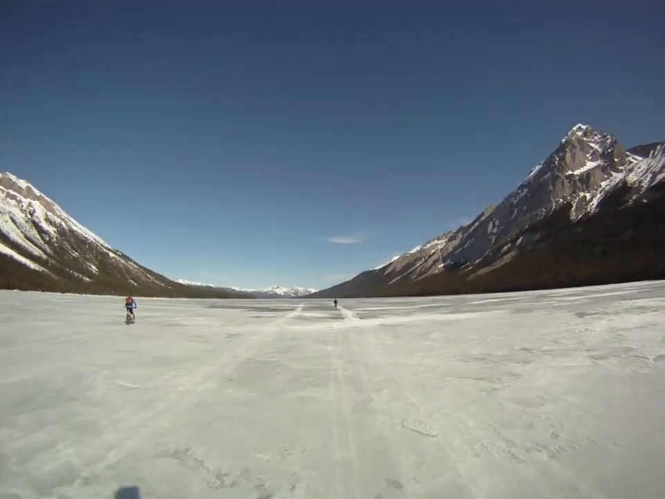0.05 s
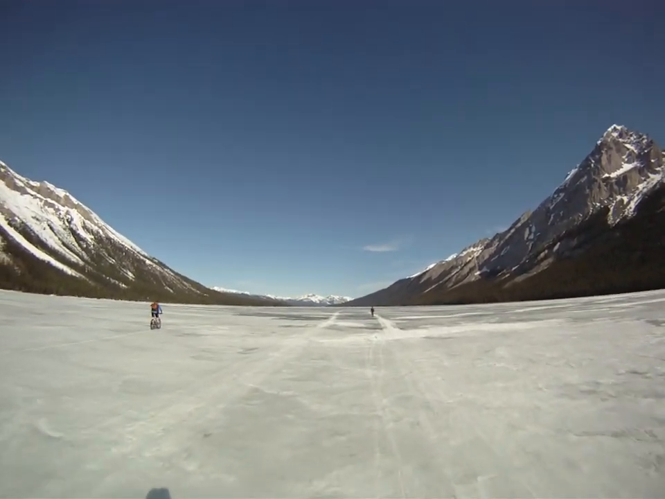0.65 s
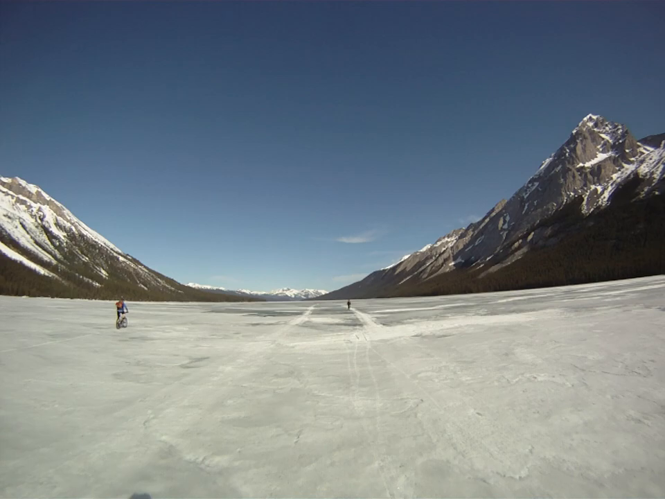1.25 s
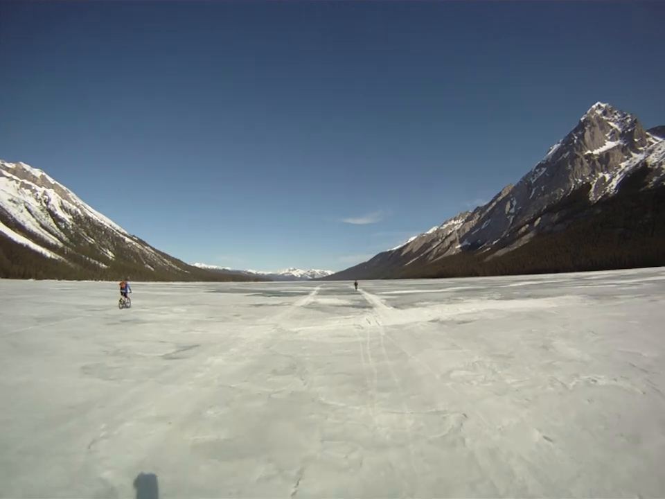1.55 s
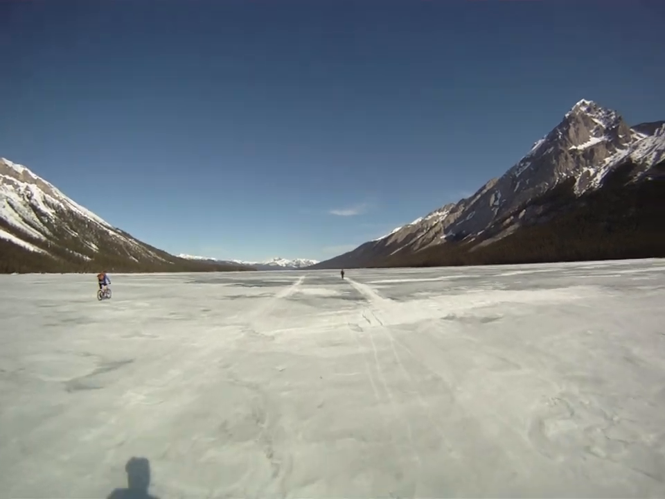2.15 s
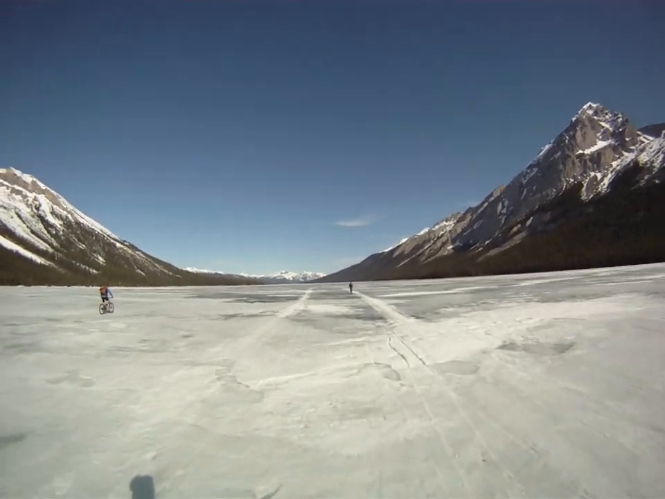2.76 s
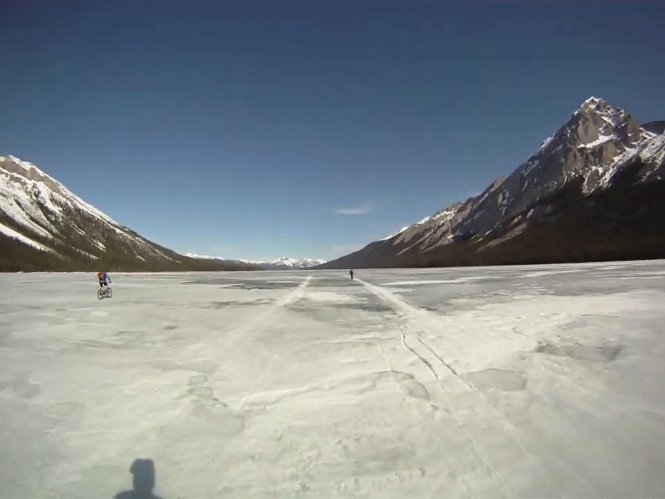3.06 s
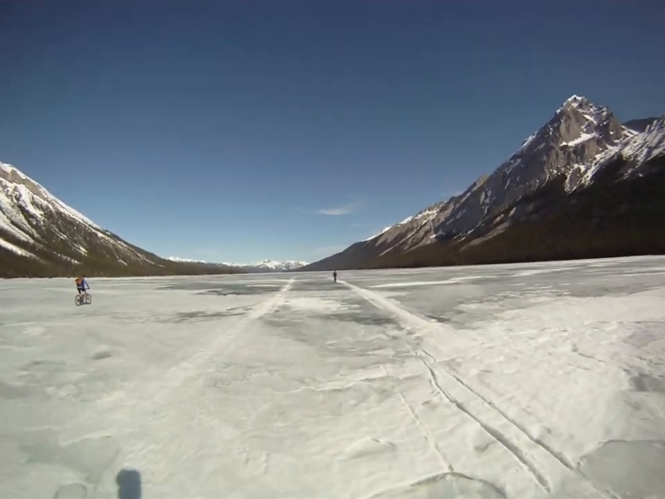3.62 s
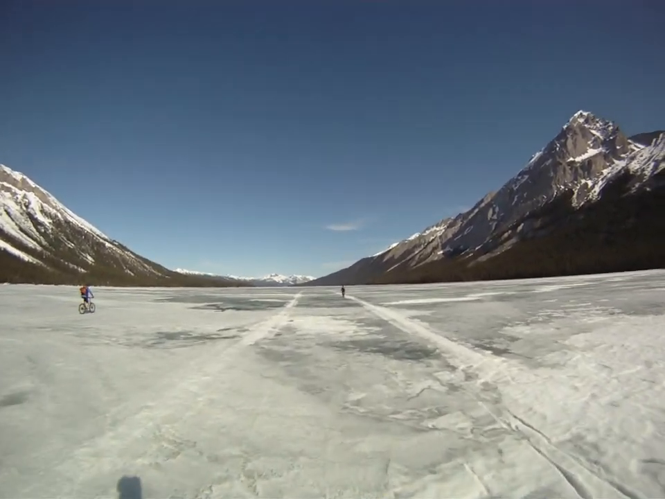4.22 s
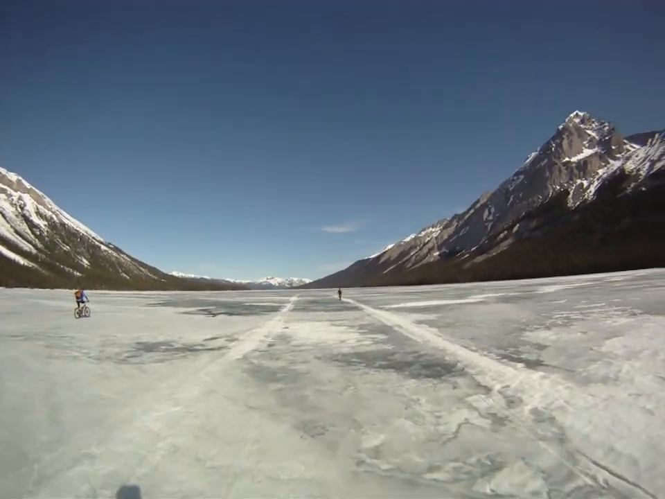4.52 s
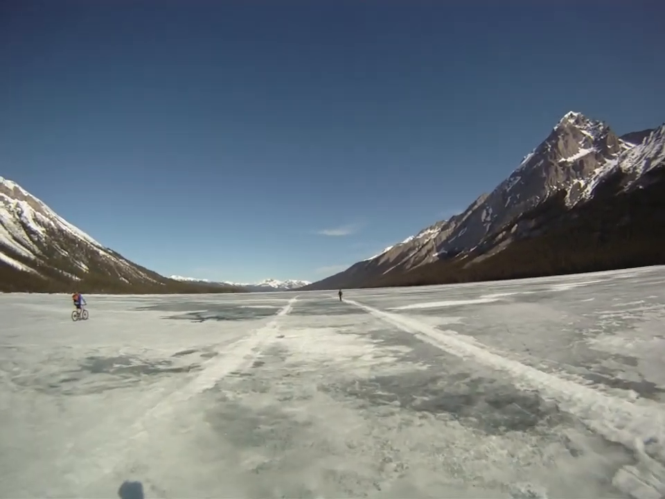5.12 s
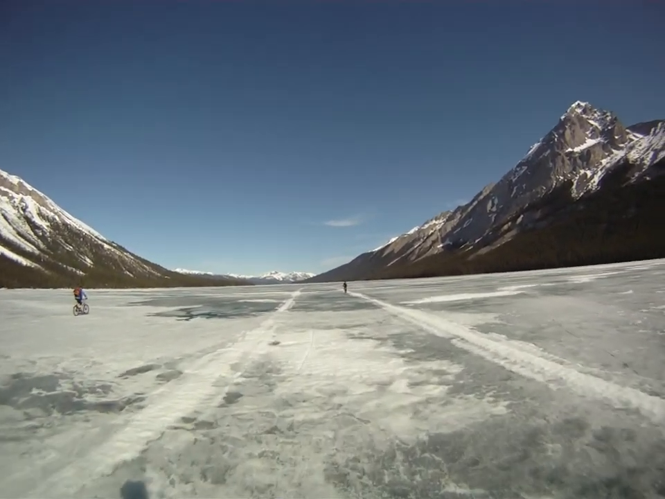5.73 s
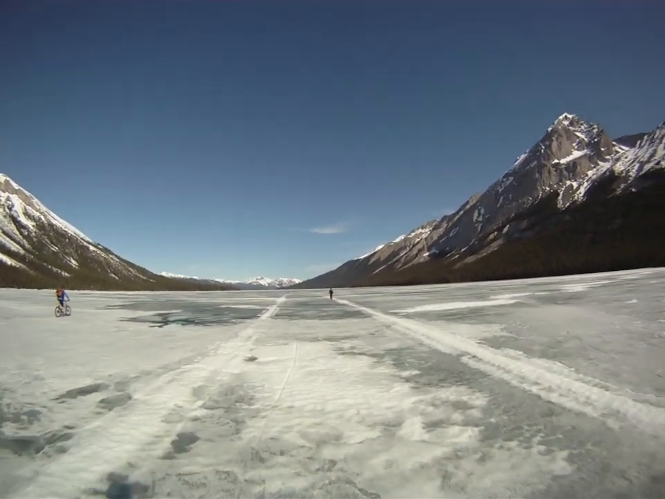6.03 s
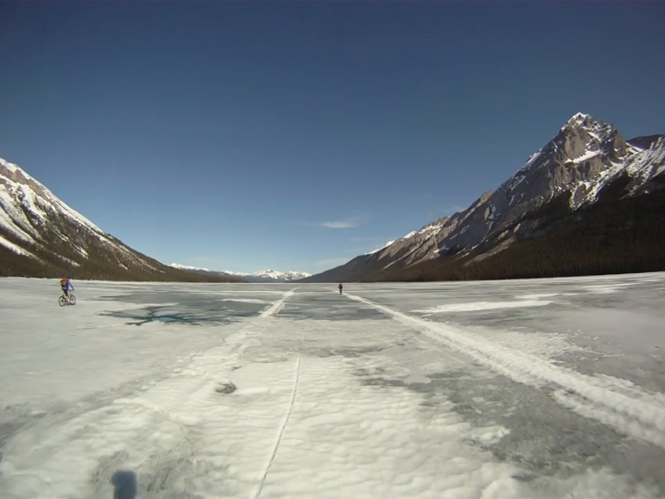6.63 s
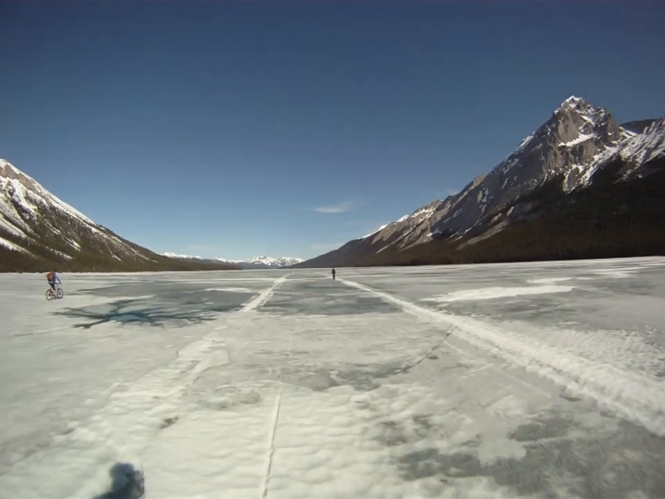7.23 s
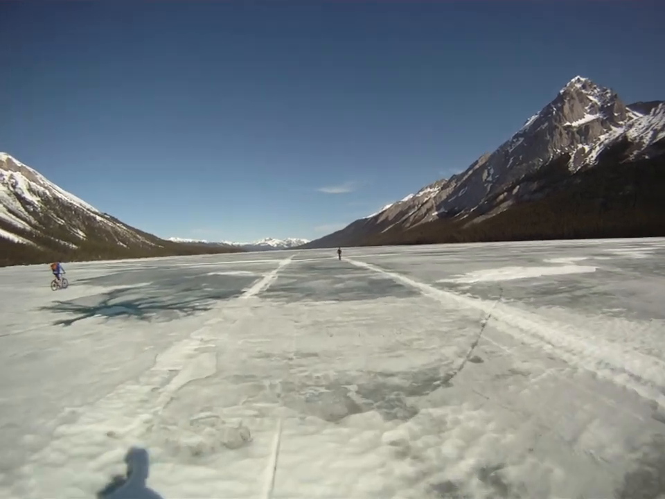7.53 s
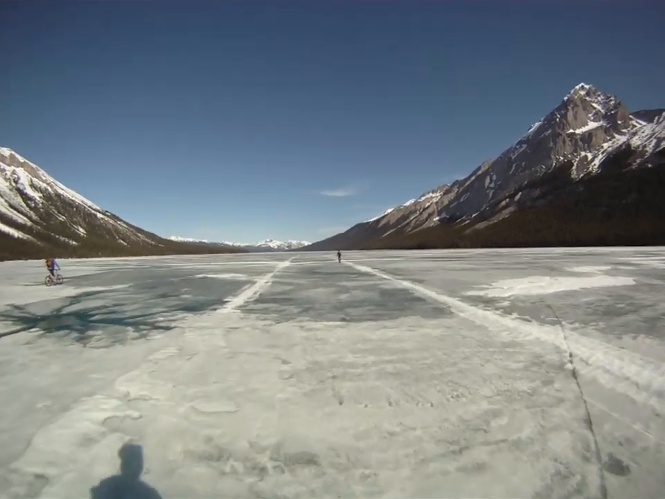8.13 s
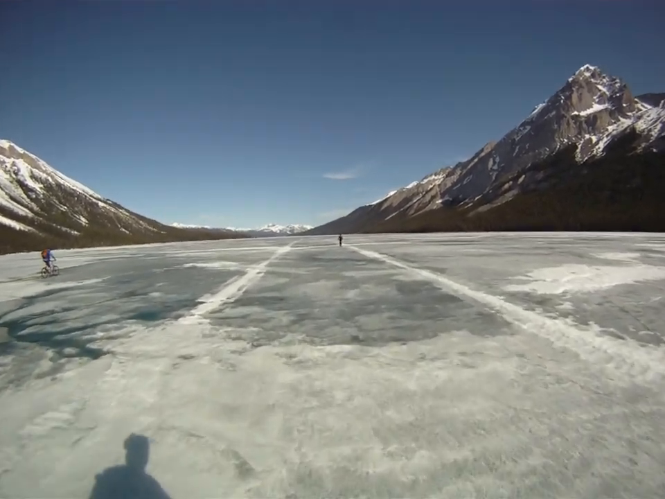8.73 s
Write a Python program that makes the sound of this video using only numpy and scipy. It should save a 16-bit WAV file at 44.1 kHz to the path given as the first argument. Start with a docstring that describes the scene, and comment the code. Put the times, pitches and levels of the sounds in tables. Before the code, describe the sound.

Bicycle tyres hiss and crackle over crusted snow and ice, with low shaking and frequent hollow plastic knocks, heard close up.

```python
"""A frozen lake under crusted snow, heard close up from a bicycle riding over it. The microphone sits
inside a plastic camera case fixed to the bike. The tyres hiss and crackle on the crust, thud on ridges,
scuff through loose snow and swish through slush; the frame shakes and the mount knocks at each jolt.
Snow, knocks and rattle reach the microphone through the resonances of the case; the bass comes direct."""
import sys
import numpy as np
from scipy import signal
from scipy.fft import rfft, irfft
from scipy.io import wavfile
from scipy.ndimage import uniform_filter1d

SR = 44100
rng = np.random.default_rng(int(sys.argv[2]) if len(sys.argv) > 2 else 0)


def pcm_store(signal):
    """Save signal as 16-bit PCM."""
    levels = np.round(np.clip(np.atleast_2d(signal), -1, 1) * 32767)
    wavfile.write(sys.argv[1], SR, levels.astype(np.int16).T)


N = 386741
TIME = np.arange(N) / SR
FILTER_HZ, SCENE_HZ = np.fft.rfftfreq(4096, 1 / SR), np.fft.rfftfreq(N, 1 / SR)
# stretches of the lake: start_s, end_s, fade_s
SLUSH = (6.75, 8.25, .2)  # wet: the tyres swish
GLAZE = (7.9, 8.3, 0.049)  # smooth ice: hardly any crust to break

# how hard the tread crushes the crust along the ride: time_s, level_db
CRUST_CRUSH = [(0.0, -44), (0.39, -46.5), (0.78, -43.5), (1.93, -45), (2.22, -44.5), (2.64, -44),
               (3.1, -42), (3.42, -45.5), (4.4, -45.5), (4.49, -46.5), (5.89, -44), (6.62, -47.5),
               (6.98, -49), (7.45, -51), (7.72, -47), (7.99, -46), (8.38, -47.5), (8.77, -45)]
# tone of the hiss outside the case: frequency_hz, gain_db
HISS_TONE = [(100, -8), (450, 3), (1150, -9.5), (1800, -5.5), (2400, 6.5), (3000, 3.5), (4100, 10.5),
             (4900, 4.5), (6000, -2), (8000, 9.5), (10000, 0), (15000, -3)]
def hiss(level_db=-1.0, flutter_db=2.5, flutter_hz=40, slush_db=-2.0, glaze_db=-5):
    """Countless snow grains crushed under the tread, in uneven patches; fewer on slush and glaze."""
    crush = rng.standard_normal(N) * amp(flutter_db * drift(flutter_hz))
    ground_db = curve(CRUST_CRUSH) + slush_db * stretch(*SLUSH) + glaze_db * stretch(*GLAZE)
    return amp(ground_db + level_db) * unit(through_case(crush, HISS_TONE))


# tone of breaking and slipping snow outside the case: frequency_hz, gain_db
GRIT_TONE = [(100, -5.5), (900, -1), (2000, 3.5), (3500, 7), (6000, 16), (8000, 9), (10000, 1), (15000, 4)]
def crackle(level_db=0.6, snap_db=-2, slush_db=0.5):
    """Flakes of crust collapse in a few milliseconds; smaller ones just snap."""
    flakes = bursts(per_s=30, spread_db=5.5, width_s=0.0022, cluster_db=4, cluster_hz=10)
    snaps = amp(snap_db) * bursts(per_s=26, spread_db=10, width_s=0.00093, cluster_db=9, cluster_hz=12)
    breaking = through_case(grains(per_s=8000) * (flakes + snaps), GRIT_TONE)
    return amp(crust_db() + slush_db * stretch(*SLUSH) + level_db) * unit(breaking)


# loud knocks of the mount, right at the microphone: start_s, level_db, hardness_db (treble over bass)
MOUNT_KNOCKS = [(0.334, -14, 2.5), (0.5735, -27, -8), (0.7236, -25, -10), (1.127, -24.5, -4),
                (1.1741, -29, -4), (1.2235, -30.5, -2), (1.3542, -27, -7.5), (1.469, -25, -8),
                (1.6388, -20, 4), (1.675, -22.5, 3), (1.8227, -26, 1), (2.0718, -27, -8),
                (2.1239, -27.5, -4.5), (2.191, -24, -0.5), (2.2688, -18, -3), (2.278, -10, -7.5),
                (2.2811, -9.5, 21), (2.3183, -19.5, -1.5), (2.395, -21, -7), (2.4001, -19, -9),
                (2.449, -22, 0.5), (2.555, -18.5, -1), (2.7186, -24, -5), (2.7672, -15.5, 2.5),
                (2.814, -19.5, -1.5), (2.9602, -18, -1.5), (3.028, -28, 0), (3.0718, -20.5, -0.5),
                (3.119, -18, 2), (3.1487, -23.5, -4), (3.1816, -21.5, -9.5), (3.3799, -26, 1),
                (3.4677, -28, -3), (3.6557, -27, -4.5), (3.906, -26, -3.5), (4.0103, -29.5, -4),
                (4.1974, -19, 1), (4.6751, -18.5, 4), (4.7, -24, -1.5), (4.74, -27, -3), (4.9073, -24, 6),
                (5.0189, -28, 5), (5.181, -23, -2.5), (5.2823, -27.5, 3), (5.7334, -26, -3),
                (5.749, -23.5, -4), (5.8705, -30, 3), (6.6075, -30, 1), (6.9329, -25, -3.5),
                (7.2591, -20.5, 1.5), (7.33, -30, -7), (7.61, -22.5, -4), (7.6446, -27, -3),
                (7.8546, -26.5, 4), (8.3845, -31, 0), (8.587, -29, -3)]
def knocks(blows, split_hz=1400, vary_db=1.0, chatter=0.033, chatter_s=0.0039, lag_s=0.00087,
           hard_bias_db=-2):
    """The mount hits its stop and chatters briefly; a harder contact rings the upper modes more."""
    out, case, t = np.zeros(N), case_gain(), np.arange(2048) / SR
    treble = .5 + .5 * np.tanh(4 * np.log((FILTER_HZ + 1) / split_hz))
    bands_hz = np.geomspace(300, 16000, 16)
    for start_s, level_db, hardness_db in blows:
        # each blow lands differently, and its paths through the plastic differ in length
        landing_db = np.interp(FILTER_HZ, bands_hz, vary_db * rng.standard_normal(len(bands_hz)))
        delay_s = np.interp(FILTER_HZ, bands_hz, lag_s * rng.random(len(bands_hz)))
        smear = np.exp(-2j * np.pi * np.cumsum(delay_s) * FILTER_HZ[1])
        click = ring(case * amp((hardness_db + hard_bias_db) * treble + landing_db))
        click = irfft(rfft(click, 2 * len(click)) * smear)
        contact = (t == 0) + chatter * rng.standard_normal(len(t)) * np.exp(-t / chatter_s)
        knock = signal.fftconvolve(contact, click)
        attack_rms = np.std(knock[:SR // 250])  # first 4 ms
        add(out, start_s - lag_s / 2, amp(level_db) * knock / attack_rms)
    return out


def light_knocks(level_db=9.5, soft_db=-10, hard_db=3):
    """Between the big knocks the mount keeps tapping, louder on rough crust."""
    return strays(crust_db() + level_db, spread_db=3, low=soft_db, high=hard_db, count=28)


# modes of the camera mount: pitch_hz, t60_s, level_db
MOUNT_MODES = [(1094, 0.033, -7.5), (1520, 0.037, -13), (1600, 0.03, -5), (2580, 0.029, -8.5),
               (3150, 0.023, -13), (3340, 0.018, -14), (10000, 0.023, -19)]
def clack(start_s=2.281):
    """The hardest jolt sets the mount itself ringing, hollow and short."""
    out, t = np.zeros(N), np.arange(4096) / SR
    modes = sum(amp(db - 60 * t / t60) * np.sin(2 * np.pi * hz * t) for hz, t60, db in MOUNT_MODES)
    add(out, start_s, modes)
    return out


# the bigger ridges passing under the tyres: peak_s, relative_level_db
RIDGES = [(0.717, -32), (1.48, -35), (1.597, -39.5), (1.691, -35), (1.972, -36), (2.277, -27.5),
          (2.407, -30.5), (2.658, -38), (2.811, -34), (2.977, -36), (3.091, -37.5), (3.183, -29),
          (3.633, -37), (4.76, -34.5), (5.3, -36), (5.731, -36.5), (5.87, -33), (6.023, -36), (6.44, -42),
          (6.618, -32), (7.27, -35), (7.823, -36.5)]
def thuds(level_db=2, pitch_hz=182, bend=0.429, glide_per_s=28, rise_s=0.011, fall_s=.013,
          heave_db=-3, heave_hz=45):
    """A tyre squeezed on a ridge gives a short boom whose pitch climbs, while the frame heaves."""
    out, t = np.zeros(N), np.arange(-.06, .08, 1 / SR)
    swell = np.exp(-np.where(t < 0, t / rise_s, t / fall_s) ** 2 / 2)
    heave_swell = amp(heave_db) * signal.windows.hann(len(t))
    climb_hz = pitch_hz * (1 + bend * np.tanh(glide_per_s * t))
    for peak_s, ridge_db in RIDGES:
        cycles = np.cumsum(climb_hz) / SR * rng.uniform(0.91, 1.05) + rng.random()
        tyre = swell * np.sin(2 * np.pi * cycles)
        heave = heave_swell * np.sin(2 * np.pi * (heave_hz * t + rng.random()))
        add(out, peak_s + t[0], amp(ridge_db + level_db) * (tyre + heave))
    return out * (1 + .35 * drift(70))


def scrunch(level_db=-2, width_s=0.02, lead_s=0.0071):
    """Each ridge that thuds is also crushed, with a coarse, dull crunch."""
    press = sum(amp(db) * np.exp(-((TIME - peak_s + lead_s) / width_s) ** 2) for peak_s, db in RIDGES)
    return amp(level_db) * press * unit(through_case(grains(per_s=1400), DULL_TONE))


# how hard the ice jolts the bike along the ride: time_s, level_db
JOLTS = [(0.0, -32.5), (0.8, -34.5), (0.95, -38.5), (1.45, -31.0), (1.9, -35), (2.25, -30.5), (3.15, -26.0),
         (3.35, -34.5), (3.75, -32.0), (4.25, -40.5), (4.7, -32.5), (5.15, -35.5), (6.65, -31.5),
         (7.3, -33.5), (7.45, -40), (7.8, -33.5), (8.05, -42), (8.75, -35)]
# spectrum of the frame shake at the microphone: frequency_hz, gain_db
SHAKE_TONE = [(8, -12.5), (18, 0.5), (27, 1.5), (38, -6.5), (55, -15.5), (80, -23), (110, -35), (180, -45),
              (300, -40.5), (900, -74), (3000, -100)]
def shake(level_db=1):
    """The frame and mount wobble over the uneven ice."""
    wobble = irfft(rfft(rng.standard_normal(N)) * colour(SHAKE_TONE, SCENE_HZ), N)
    steady = wobble / np.sqrt(uniform_filter1d(wobble ** 2, size=9000))
    return amp(curve(JOLTS) + level_db) * steady


def pushes(blows, level_db=-4.0, width_s=0.0034, lead_s=0.00072):
    """The bump behind each knock also shoves the frame: one low swing, bigger on rough ice."""
    out, u = np.zeros(N), np.linspace(-4, 4, int(8 * width_s * SR))
    swing = u * np.exp((1 - u ** 2) / 2)
    shove_db = jolt_db(shake_share=0.64, crust_share=0.17) + level_db
    for knock_s, _, _ in blows:
        add(out, knock_s - lead_s - len(u) / (2 * SR), amp(np.interp(knock_s, TIME, shove_db)) * swing)
    return out


# the clearest scuffs through loose snow: middle_s, relative_level_db, width_s
SNOW_SCUFFS = [(0.199, -32.5, 0.0095), (0.445, -32.5, 0.01), (0.815, -33.5, 0.03), (1.796, -32, 0.026),
               (1.922, -33.5, 0.0095), (3.527, -34.5, 0.01), (3.88, -37, 0.041), (4.025, -32, 0.027),
               (4.256, -31, 0.009), (4.28, -32, 0.011), (7.503, -32.5, 0.047), (7.805, -34.5, 0.034),
               (8.017, -35, 0.0078), (8.34, -33, 0.013), (8.48, -39, 0.011)]
def scuffs(level_db=2, slip_hz=2200, bend=.5, roughness=.5, grain_db=3):
    """The tread slips on snow: fast, ragged stick-slip whose rate dips in the middle of the scuff."""
    out = np.zeros(N)
    for middle_s, scuff_db, width_s in SNOW_SCUFFS + light_scuffs():
        u = np.linspace(-2, 2, int(2 * width_s * SR))
        rate_hz = slip_hz * (1 + bend * u ** 2) * (1 + roughness * rng.standard_normal(len(u)))
        slip_count = np.floor(np.cumsum(rate_hz) / SR)
        slips = np.diff(slip_count, prepend=0) - rate_hz / SR  # one click a slip, centred on zero
        slips = slips * amp(grain_db * rng.standard_normal(len(u))) * np.exp(-u ** 2)
        add(out, middle_s - width_s, amp(scuff_db + level_db) / 2 * unit(through_case(slips, GRIT_TONE)))
    return out


def light_scuffs(level_db=7, short_s=.008, long_s=0.017):
    """The tread also slips briefly about twice a second."""
    return strays(crust_db() + level_db, spread_db=10.5, low=short_s, high=long_s, count=15)


# tone of loose fittings and crushed ridges outside the case: frequency_hz, gain_db
DULL_TONE = [(100, 9), (500, 12), (1000, 3), (2000, -5), (5000, -2), (15000, 0.5)]
def rattle(level_db=-15):
    """Soft, dull taps of loose fittings, stronger when the bike is jolted."""
    taps = grains(per_s=5000)
    taps *= bursts(per_s=36, spread_db=8.5, width_s=0.00094, cluster_db=8.5, cluster_hz=10)
    drive_db = jolt_db(shake_share=0.8, crust_share=0.57)
    return amp(drive_db + level_db) * unit(through_case(taps, DULL_TONE))


def boom(level_db=-18.0, pitch_hz=180, width_hz=62, gust_db=12, gust_hz=11.2):
    """Small bumps keep the tyres booming faintly, in fits."""
    resonance = 1 / (1 + ((SCENE_HZ - pitch_hz) / width_hz) ** 2) ** 2
    air = irfft(rfft(rng.standard_normal(N)) * resonance, N)
    fits = amp(gust_db * np.tanh(drift(gust_hz)))
    return amp(jolt_db(shake_share=0.72, crust_share=0.87) + level_db) * unit(air * fits)


# tone of the wet spray outside the case: frequency_hz, gain_db
SPRAY_TONE = [(100, -10), (450, 8.5), (800, -5.5), (1250, 5.5), (1800, -3.5), (2400, -1), (3000, 1.5),
              (4100, 14.5), (4900, 10), (6000, 1), (8000, 14.5), (10000, -6.5), (15000, 0)]
def swish(level_db=-46, flutter_db=1, flutter_hz=30, dry_db=-11):
    """Fine, even spray from the tyres, strongest in the slush."""
    spray = rng.standard_normal(N) * amp(flutter_db * drift(flutter_hz))
    return amp(level_db + dry_db * (1 - stretch(*SLUSH))) * unit(through_case(spray, SPRAY_TONE))


# resonances of the case around the microphone: pitch_hz, width_hz, gain_db
CASE_MODES = [(998, 226, -6), (1168, 145, -2.5), (1481, 44, -8.5), (1817, 220, -5), (2085, 330, -3),
              (2494, 485, -9.5), (2970, 403, -13), (3593, 180, -17.5), (3996, 640, -20), (4834, 100, -23),
              (5170, 250, -21), (5500, 450, -25.5), (6736, 670, -24), (7220, 130, -28), (7860, 310, -24),
              (8400, 154, -21), (9240, 470, -18.5), (9880, 405, -14), (10890, 230, -21), (11900, 420, -40),
              (13200, 98, -21.5), (14040, 340, -15.5), (15240, 290, -19.5)]
# anti-resonances of the case: pitch_hz, width_hz, gain_db
CASE_NOTCHES = [(1360, 56, -6)]
def case_gain(wall_db=-7, wall_hz=250):
    """What the microphone hears of the outside: the case's resonances and dips, and bass via the wall."""
    modes = sum((amp(db) / (1 + 2 * ((FILTER_HZ - hz) / width) ** 2)) ** 2 for hz, width, db in CASE_MODES)
    wall = (amp(wall_db) / (1 + (FILTER_HZ / wall_hz) ** 4)) ** 2
    dips_db = sum(db * np.exp(-((FILTER_HZ - hz) / width) ** 2) for hz, width, db in CASE_NOTCHES)
    return np.sqrt(modes + wall) * amp(dips_db)


def through_case(x, tone):
    """Colours a source and rings it through the case."""
    return signal.oaconvolve(x, ring(case_gain() * colour(tone)))[:len(x)]


def ring(gain):
    """The causal click that has this spectrum."""
    cepstrum = irfft(np.log(gain + 1e-6))
    half = len(cepstrum) // 2
    cepstrum[1:half] *= 2
    cepstrum[half + 1:] = 0
    return irfft(np.exp(rfft(cepstrum)))[:half]


def crust_db(glaze_db=-12):
    """How much crust breaks under the tyres; little does on the glaze."""
    return curve(CRUST_CRUSH) + glaze_db * stretch(*GLAZE)


def jolt_db(shake_share, crust_share):
    """How hard a part is jolted: it follows the frame shake, and less where the crust is smooth."""
    jolt, crust = curve(JOLTS), crust_db()
    return jolt.mean() + shake_share * (jolt - jolt.mean()) + crust_share * (crust - crust.mean())


def stretch(start_s, end_s, fade_s):
    """1 while the tyres are on a stretch of the lake, 0 elsewhere."""
    return np.clip(np.minimum(TIME - start_s, end_s - TIME) / fade_s + .5, 0, 1)


def strays(drive_db, spread_db, low, high, count):
    """Small events at chance times, as rows: time_s, level_db, a trait between low and high."""
    when, size, trait = rng.random((count, 3)).T
    time_s = (np.arange(count) + when) / count * TIME[-1]
    level_db = np.interp(time_s, TIME, drive_db) + spread_db * (2 * size - 1)
    return list(zip(time_s, level_db, low + (high - low) * trait))


def bursts(per_s, spread_db, width_s, cluster_db, cluster_hz):
    """Envelope of short bursts of uneven size that come in clusters."""
    rate = per_s * unit(amp(cluster_db * np.tanh(2 * drift(cluster_hz))))
    starts = amp(spread_db * np.tanh(rng.standard_normal(N))) * (rng.random(N) < rate / SR)
    u = np.linspace(-3, 3, int(6 * width_s * SR))
    return np.sqrt(abs(signal.oaconvolve(starts ** 2, np.exp(-u ** 2), "same")))


def grains(per_s):
    """A dense train of tiny clicks."""
    return unit(rng.standard_normal(N) * (rng.random(N) < per_s / SR))


def drift(hz):
    """Smooth random wander of rms 1, rolling off above hz."""
    return unit(irfft(rfft(rng.standard_normal(N)) * np.exp(-(SCENE_HZ / hz) ** 2), N))


def colour(tone, hz=FILTER_HZ):
    """Gain of a frequency_hz, gain_db table on a log-frequency axis."""
    frequency_hz, gain_db = np.transpose(tone)
    return amp(np.interp(np.log(hz + 1), np.log(frequency_hz + 1), gain_db))


def curve(rows):
    """A time_s, level_db table at every sample."""
    return np.interp(TIME, *np.transpose(rows))


def add(mix, start_s, sound):
    """Mixes a sound in at start_s."""
    part = mix[max(round(start_s * SR), 0):][:len(sound)]
    part += sound[:len(part)]


def amp(db):
    """Decibels to gain."""
    return 10 ** (np.asarray(db) / 20)


def unit(x):
    """Scales to rms 1."""
    return x / np.sqrt(np.mean(x ** 2) + 1e-20)


def scene():
    """Snow, tyres, frame and mount together at the one microphone."""
    snow = hiss() + swish() + crackle() + scuffs() + scrunch()
    blows = MOUNT_KNOCKS + light_knocks()
    bike = thuds() + boom() + shake() + rattle() + pushes(blows) + knocks(blows) + clack()
    return (snow + bike)[None]


def record(dry, cutoff_hz=15700):
    """The hardest knock overloads the microphone input; then the top of the treble is cut."""
    lowpass = signal.firwin(255, cutoff_hz, window=("kaiser", 8), fs=SR)
    return signal.oaconvolve(np.clip(dry, -1, 1), lowpass[None], "same")


dry = scene()
out = record(dry)
pcm_store(out)
```